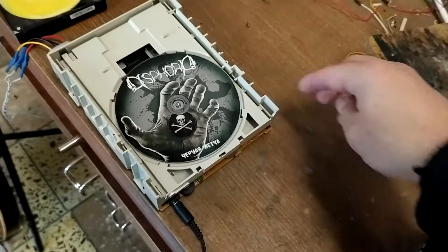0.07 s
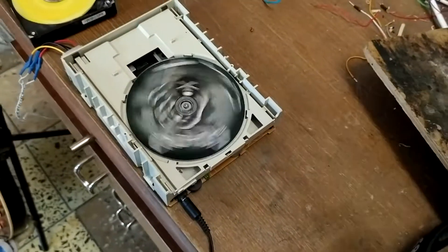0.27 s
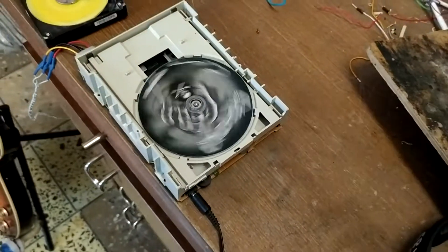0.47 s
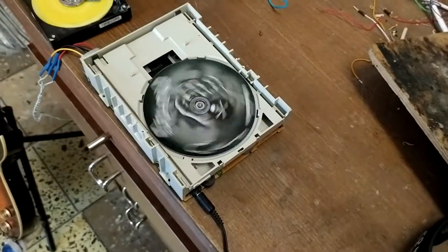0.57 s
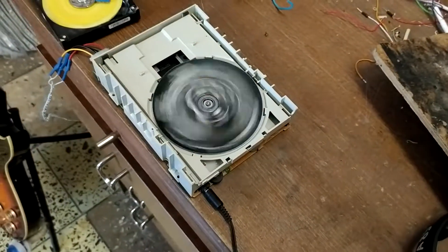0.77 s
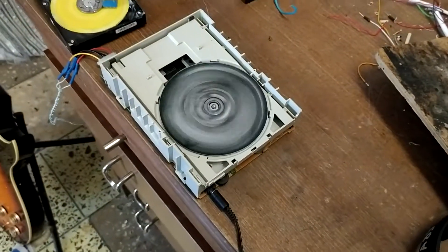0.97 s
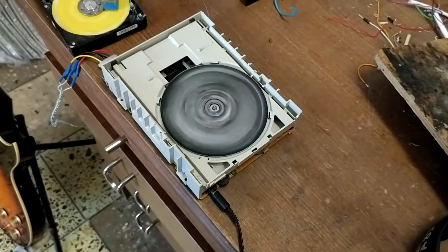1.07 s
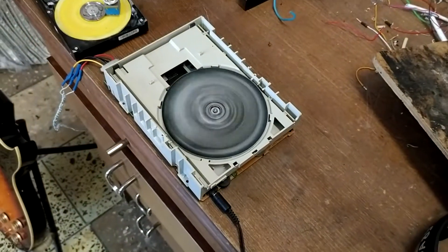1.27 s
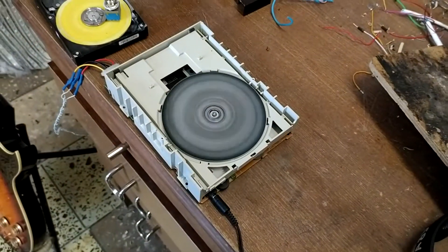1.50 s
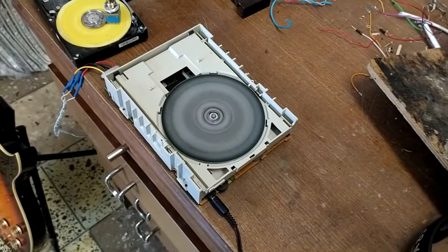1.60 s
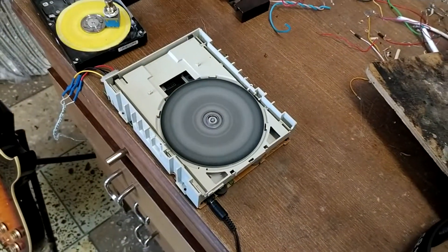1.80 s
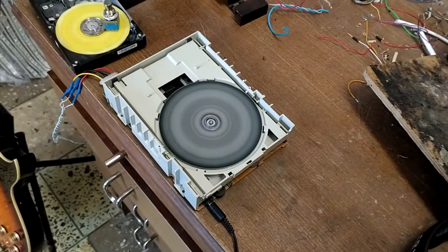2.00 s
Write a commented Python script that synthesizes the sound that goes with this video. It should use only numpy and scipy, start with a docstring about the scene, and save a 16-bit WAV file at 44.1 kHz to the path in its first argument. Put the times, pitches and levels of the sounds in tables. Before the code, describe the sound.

An open disc drive on a workbench gives a short buzzing kick, pauses, then buzzes for a second, breaking into a plastic rattle and whine. It stops and the disc swishes faintly. Close, to the left, over low room hum.

```python
"""A low room hum, then an open disc drive on a workbench: its motor kicks briefly, then runs for a
second and spins the disc up. The drive buzzes at a slowly rising rate; with speed the buzz breaks
into a plastic rattle with whining side tones. The plastic frame rings on after each stop,
and air swishes on the coasting disc."""
import sys
import numpy as np
from scipy import signal
from scipy.fft import rfft, irfft
from scipy.io import wavfile
from scipy.ndimage import uniform_filter1d

SR = 44100
rng = np.random.default_rng(int(sys.argv[2]) if len(sys.argv) > 2 else 0)


def wrap_up_sound(samples):
    """Save the sound to the file named by the first command line argument, as 16-bit audio."""
    columns = np.atleast_2d(samples).T
    # keep every value between -1 and 1, then stretch to whole-number steps
    tamed = np.clip(columns, -1, 1)
    steps = np.round(tamed * 32767).astype(np.int16)
    wavfile.write(sys.argv[1], SR, steps)


N = 90404
T = np.arange(N) / SR
BIN_HZ = np.fft.rfftfreq(N, 1 / SR)
ATTACK_S, RELEASE_S = 0.0095, 0.0057

# motor runs: start_s, stop_s, phase_shake_cycles, frame_db
MOTOR_RUNS = [(0.201, .283, .055, -23.5), (0.749, 1.771, 0.01, -55)]
# vibration rate: time_s, rate_hz
BUZZ_RATE = [(.2, 262), (.28, 270.5), (.755, 256), (.785, 261.2), (.82, 265.6), (.92, 268.7), (1.08, 270.1),
             (1.18, 274.1), (1.33, 273.8), (1.42, 278.4), (1.5, 279.6), (1.6, 285.6), (1.77, 290.5)]
# levels under power: time_s, buzz_db, rattle_db, hiss_db
DRIVE_LEVELS = [(.21, -17.5, -11, -18), (.28, -15, -13.5, -18.5), (.755, -25, -23, -29.5),
                (.785, -22, -29, -29.5), (.82, -18.5, -33, -29), (.92, -20, -31.5, -28),
                (1.03, -21, -22, -29), (1.15, -26.5, -22.5, -29.5), (1.42, -26.5, -25, -32),
                (1.6, -31.5, -24, -31), (1.69, -32.5, -25, -32), (1.76, -36.5, -22.5, -30.5)]


def undb(db):
    return 10 ** (np.asarray(db) / 20)


def unit_rms(x):
    return x / np.sqrt(np.mean(x ** 2))


def curve(table, column=1):
    """Table column, linear in time."""
    rows = np.array(table, float)
    return np.interp(T, rows[:, 0], rows[:, column])


def gains(shape):
    """Gain per bin from rows of freq_hz, gain_db."""
    hz, db = np.array(shape, float).T
    return undb(np.interp(np.log(BIN_HZ + 1), np.log(hz), db))


def colour(x, shape):
    """Minimum-phase filter; output rms 1."""
    cepstrum = irfft(np.log(gains(shape)), N)
    folded = 2 * cepstrum * (np.arange(N) < N // 2)
    response = irfft(np.exp(rfft(folded)), N)
    return unit_rms(signal.fftconvolve(x, response[None, :N // 20], axes=1)[:, :N])


def walk(rate_hz):
    """Smooth random motion, rms 1."""
    width = int(SR / rate_hz)
    smoothed = uniform_filter1d(rng.standard_normal(N), width, mode="wrap")
    return unit_rms(uniform_filter1d(smoothed, width, mode="wrap"))


def stereo_noise(apart_hz=3040):
    """White noise, common to both channels below apart_hz, independent above."""
    common, own = rng.standard_normal(N), rng.standard_normal((2, N))
    share = 1 / (1 + (BIN_HZ / apart_hz) ** 2)
    return irfft(rfft(common) * np.sqrt(share) + rfft(own) * np.sqrt(1 - share), N)


def gate(start_s, stop_s, release_s=RELEASE_S):
    """Linear rise at power-on, exponential decay at power-off."""
    rise = np.clip((T - start_s) / ATTACK_S, 0, 1)
    return rise * np.exp(-np.maximum(T - stop_s, 0) / release_s)


def motor_on(release_s=RELEASE_S):
    """Envelope of both runs."""
    return sum(gate(start_s, stop_s, release_s) for start_s, stop_s, _, _ in MOTOR_RUNS)


def tone(hz):
    """Sine wavering in phase and level; steadier below 800 Hz."""
    depth = np.minimum(hz / 800, 1)
    wander_cycles = rng.random() + depth * (.045 * walk(44) + .12 * walk(8.8))
    waver_db = depth * 2.3 * walk(24.4)
    cycles = np.cumsum(hz) / SR + wander_cycles
    return np.sqrt(2) * np.sin(2 * np.pi * cycles) * undb(waver_db)


def room_hum():
    """Low hum and faint hiss, over a rumble that differs left to right."""
    # noise spectra: freq_hz, gain_db
    hum_shape = [(20, -21), (60, -17.5), (100, -1.5), (150, -5), (280, -2), (450, -9.5), (700, -16),
                 (1500, -23), (4000, -26.5), (6500, -26), (10500, -23), (12500, -24), (16000, -51)]
    rumble_shape = [(20, -14), (45, -6), (95, 1), (170, -6), (400, -25), (2000, -57)]
    hum = colour(stereo_noise(apart_hz=463), hum_shape) * undb(-40.5 + walk(18))
    rumble = colour(rng.standard_normal((2, N)), rumble_shape) * undb(-52.5)
    return hum + rumble


def disc_swish():
    """Flickering rush of air on the turning disc, plus a faint high hiss."""
    # noise spectra: freq_hz, gain_db
    hiss_shape = [(1000, -34), (3000, 3), (3550, 8), (4100, -12.5), (7000, 5.5), (10500, 13.5),
                  (15500, -13.5)]
    air_shape = [(100, -21), (400, -3), (700, -5), (1150, 4), (1700, 0), (2500, -6.5), (4000, -16.5),
                 (16000, -31)]
    # envelopes: time_s, level_db
    hiss_level = [(0, -85), (.2, -41), (.33, -46.5), (.5, -51.5), (.6, -72), (.74, -60), (1.8, -53),
                  (2.05, -70)]
    air_level = [(0, -111), (.2, -37), (.33, -56), (.5, -61), (.75, -61), (1.75, -38), (2.05, -41.5)]
    hiss = colour(stereo_noise(), hiss_shape) * undb(curve(hiss_level))
    air = colour(stereo_noise(), air_shape) * undb(curve(air_level) + 1.3 * walk(32))
    return air + hiss


def buzz():
    """Regular vibration: partials shake together; the fifth dominates at speed."""
    # partials: rate_multiple, slow_db, fast_db
    partials = [(2, -8, -17.5), (3, -14, -29), (4, -9, -25), (5.007, 1, 3), (6.03, -9, -4.5),
                (7.01, -1.5, -5), (8.025, -9.5, -10), (8.99, -11, -8.5), (10.01, -11.5, -11),
                (11, -20, -30), (13, -18.5, -13.5), (14.3, -26, -28), (19.2, -19, -33), (19.86, -19, -26),
                (27.7, -23, -24), (29, -18, -37)]
    slow_hz, fast_hz = 266, 278.4
    rate_hz = curve(BUZZ_RATE)
    depth_cycles = sum(shake * gate(start_s, stop_s) for start_s, stop_s, shake, _ in MOTOR_RUNS)
    shaken_hz = rate_hz + np.gradient(walk(131) * depth_cycles) * SR
    fast_share = np.clip((rate_hz - slow_hz) / (fast_hz - slow_hz), 0, 1)
    vibration = sum(undb(slow_db + (fast_db - slow_db) * fast_share) * tone(multiple * shaken_hz)
                    for multiple, slow_db, fast_db in partials)
    return unit_rms(vibration) * undb(curve(DRIVE_LEVELS))


def rattle():
    """Plastic knocks once a cycle, unevenly; each knock trails a scrape and a rubbing hiss."""
    # plastic and rubbing spectra: freq_hz, gain_db
    plastic_shape = [(50, -54), (130, -25), (200, -29.5), (280, -6.5), (370, -27.5), (450, -2.5), (540, 1),
                     (660, -2.5), (850, -0.5), (1100, -3.5), (1360, 0), (1480, -3.5), (1640, 4),
                     (1880, 0.5), (2080, -4), (2500, -4.5), (3000, -15), (4000, -33), (8000, -40),
                     (16000, -73)]
    hiss_shape = [(500, 5), (2000, -25), (3000, -2), (3500, 0.5), (4300, -3), (5300, -1), (6400, -3.5),
                  (7800, -1.5), (9300, -2.5), (11300, 2.5), (12500, -17), (16000, -38.5)]
    jitter_cycles, scatter_db, scrape_cycles, scrape_db = .16, 3.5, 0.81, 3
    cycles = np.cumsum(curve(BUZZ_RATE)) / SR
    beats = np.arange(1, int(cycles[-1]))
    lateness, strength = rng.standard_normal((N // 100, 2))[:len(beats)].T
    knock_samples = np.interp(beats + jitter_cycles * lateness, cycles, np.arange(N)).astype(int)
    knocks = np.bincount(knock_samples, undb(scatter_db * strength), N)
    decay = np.exp(-cycles[-1] / N / scrape_cycles)
    contact = signal.lfilter([1], [1, -decay], knocks)
    scrape = undb(scrape_db) * unit_rms(contact * stereo_noise())
    plastic = colour(unit_rms(knocks - knocks.mean()) + scrape, plastic_shape)
    plastic = 2.6 * np.tanh(plastic / 2.6)  # round off the sharpest knocks
    hiss = colour((unit_rms(contact) + 1.9) * stereo_noise(), hiss_shape)
    return plastic * undb(curve(DRIVE_LEVELS, column=2)) + hiss * undb(curve(DRIVE_LEVELS, column=3))


def whines():
    """A sinking hum and gliding side tones that swell and fade; the low side tones ring on."""
    # drive hum: time_s, pitch_hz, level_db
    hum = [(.21, 256, -24.5), (.28, 256, -20), (.755, 257, -44), (.8, 256, -31), (1, 251, -33),
           (1.25, 245, -37), (1.5, 241, -39), (1.77, 241, -39.5)]
    # side tones: peak_s, pitch_hz, glide_hz_per_s, sigma_s, level_db
    side_tones = [(.24, 815, -200, .04, -27), (.24, 1070, -1, 0.05, -28), (0.261, 296, -60.5, 0.032, -27.5),
                  (.77, 1012, 299.5, .03, -33.5), (.84, 805, 300, 0.073, -36), (.82, 1852, 0, 0.034, -25),
                  (1.33, 335, 39.5, 0.089, -42.5), (1.45, 429, 4.5, 0.36, -41),
                  (.77, 510, -38.5, 0.11, -30), (1.17, 490, -71, 0.11, -33.5), (1.71, 501, 50, 0.17, -28.5),
                  (1.55, 632, 100.5, .26, -35.5), (1.8, 800, 58.5, 0.15, -38.5),
                  (2.2, 950, 100.5, 0.046, -32), (1.48, 912, 170, 0.093, -39.5),
                  (1.4, 1172, 145, 0.22, -35.5), (1.3, 1320, 150, .08, -33.5),
                  (1.35, 1648, 150, 0.078, -29), (1.68, 1645, 66, 0.17, -45),
                  (.765, 2400, 1.5, 0.04, -35.5), (1.7, 1500, 199, 0.2, -38), (1.35, 1868, 99, 0.58, -36)]
    ring_below_hz = 560
    ringing, damped = motor_on(release_s=0.033), motor_on()
    tones = tone(curve(hum)) * undb(curve(hum, column=2)) * damped
    for peak_s, pitch_hz, glide_hz_per_s, sigma_s, level_db in side_tones:
        swell = undb(level_db) * np.exp(-.5 * ((T - peak_s) / sigma_s) ** 2)
        envelope = swell * (ringing if pitch_hz < ring_below_hz else damped)
        tones += tone(pitch_hz + glide_hz_per_s * (T - peak_s)) * envelope
    return tones


def frame_ring():
    """The shaken frame rings in its low modes, hardest at the first kick."""
    # frame modes: freq_hz, t60_s, energy_db
    modes = [(180.4, 0.59, 0), (292, 0.066, 11), (444, .1, -25), (546, 0.13, 9.5), (827, .1, 6),
             (1070, 0.12, -10)]
    force = sum(undb(db) * gate(start_s, stop_s) for start_s, stop_s, _, db in MOTOR_RUNS)
    shaking = rng.standard_normal(N) * force
    ring = sum(undb(db - 60 * T / t60_s) / np.sqrt(t60_s) * np.cos(2 * np.pi * hz * T)
               for hz, t60_s, db in modes)
    return signal.fftconvolve(shaking, unit_rms(ring) / np.sqrt(N))[:N]


def place_left(x):
    """The drive lies to the left: louder and earlier there; the workshop adds a short echo."""
    # balance: freq_hz, left_minus_right_db
    balance = [(100, 12), (220, -4.5), (380, 5.5), (700, 3), (1300, 10.5), (2400, 8.5), (4400, 9.5),
               (7500, 13), (10500, 2), (14000, -29.5)]
    # echo spectrum: freq_hz, gain_db
    echo_shape = [(200, 5), (1800, 0), (5000, -4.5), (16000, -13)]
    right_lag_s, echo_t60_s, echo_db = 0.00012, 0.21, -20
    lean = np.sqrt(gains(balance))
    lag = np.exp(-2j * np.pi * BIN_HZ * right_lag_s)
    direct = irfft(rfft(x) * np.array([lean, lag / lean]), N)
    tail = colour(rng.standard_normal((2, N)), echo_shape) * undb(-60 * T / echo_t60_s)
    echo = signal.fftconvolve(x, unit_rms(tail) / np.sqrt(N), axes=1)[:, :N]
    return direct + undb(echo_db) * echo


def scene():
    """Drive and disc, placed in the room."""
    motor_db, low_cut_hz = 3.5, 150
    motor = undb(motor_db) * (motor_on() * (buzz() + rattle()) + whines() + frame_ring())
    # low cut keeps the buzz and rattle free of rumble
    motor = signal.sosfilt(signal.butter(4, low_cut_hz, "high", fs=SR, output="sos"), motor)
    return place_left(motor + disc_swish()) + room_hum()


def steep_lowpass(x, hz):
    return signal.sosfilt(signal.ellip(10, .2, 80, hz, fs=SR, output="sos"), x)


def record(dry):
    """Gain control ducks loud stretches; peaks are rounded; the top is cut, lower on the left."""
    threshold_db, duck_db_per_db, window_s, peak_limit = -29.5, 0.3, 0.017, 1.3
    power = uniform_filter1d(np.mean(dry ** 2, axis=0), int(window_s * SR))
    ducked = dry * (1 + np.abs(power) / undb(threshold_db) ** 2) ** (-duck_db_per_db / 2)
    left, right = peak_limit * np.tanh(ducked / peak_limit)
    left = steep_lowpass(left, hz=12150)
    return steep_lowpass(np.array([left, right]), hz=15700)


dry = scene()
out = record(dry)
wrap_up_sound(out)
```